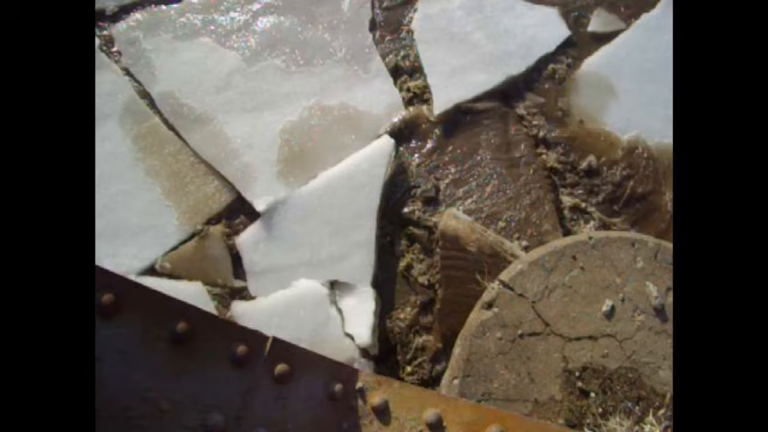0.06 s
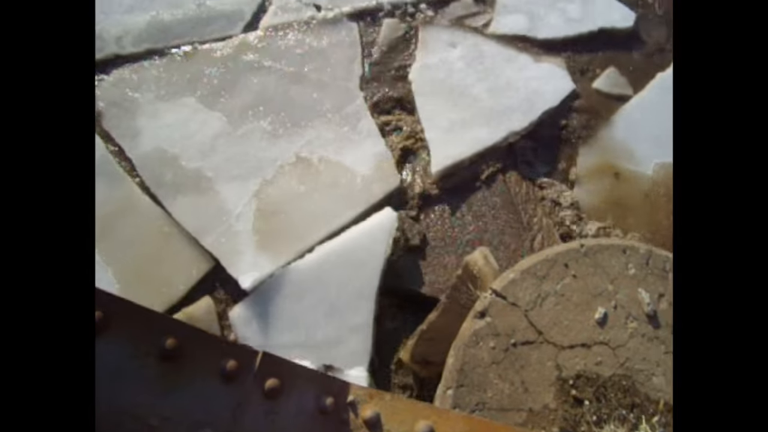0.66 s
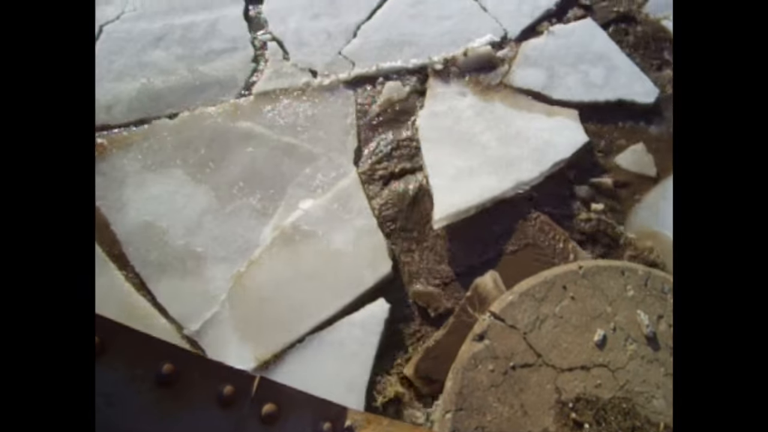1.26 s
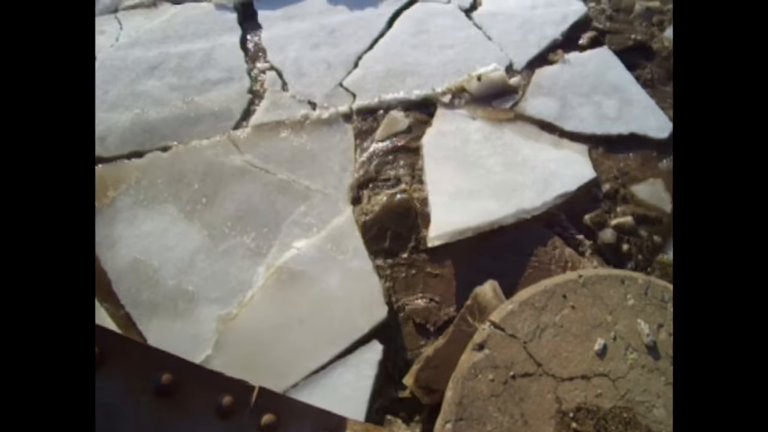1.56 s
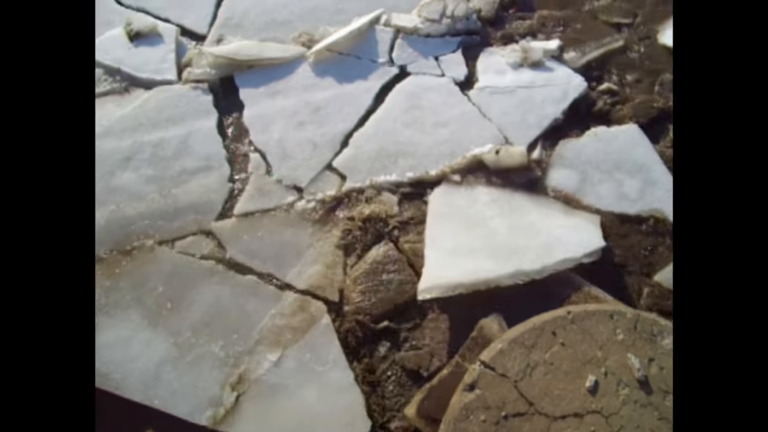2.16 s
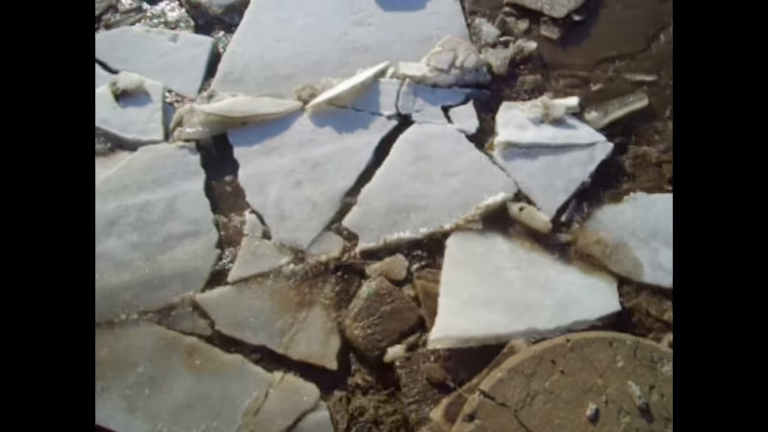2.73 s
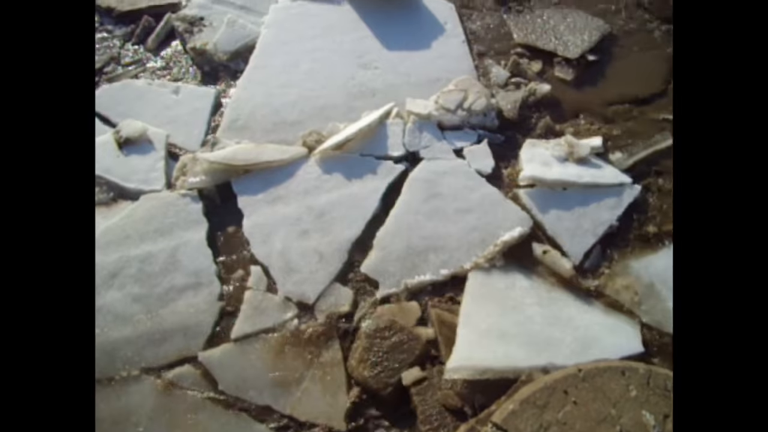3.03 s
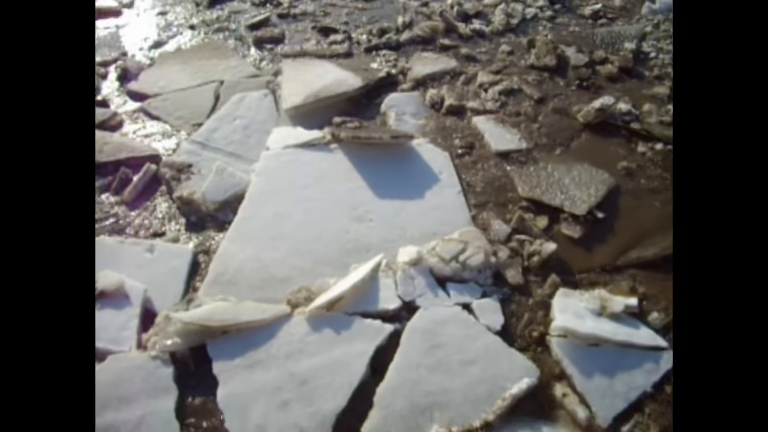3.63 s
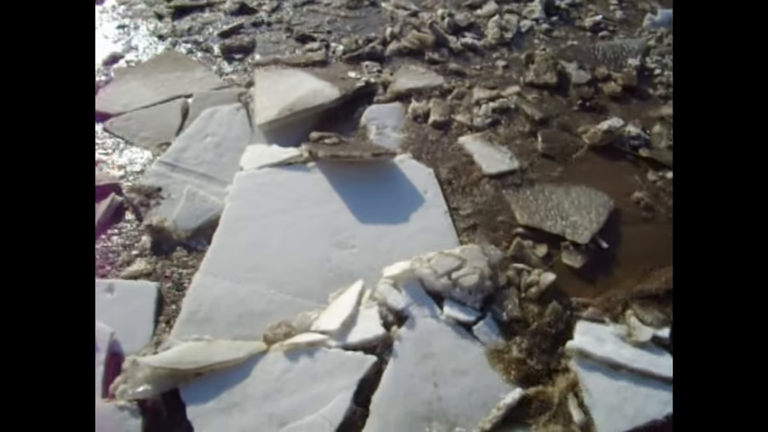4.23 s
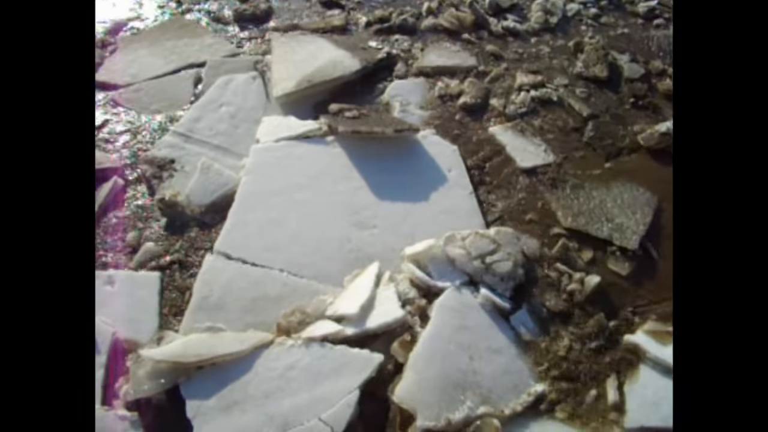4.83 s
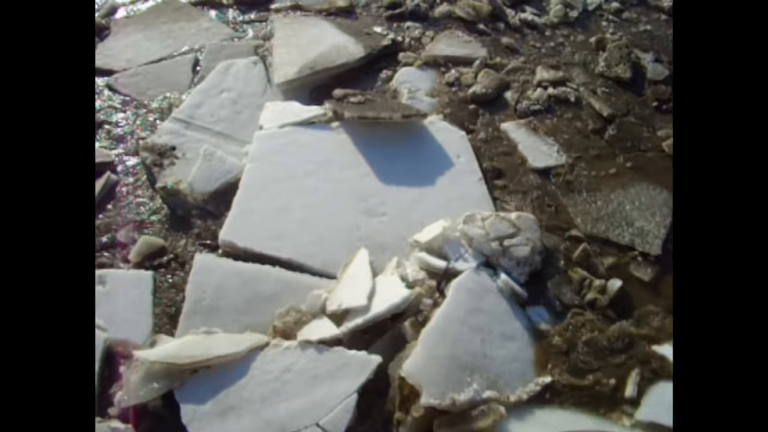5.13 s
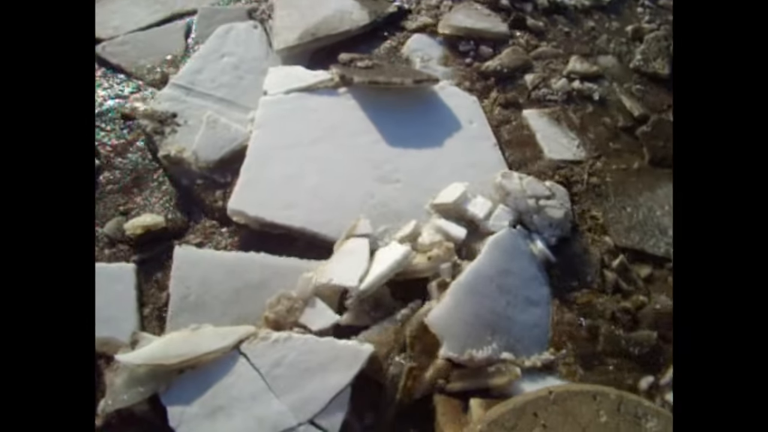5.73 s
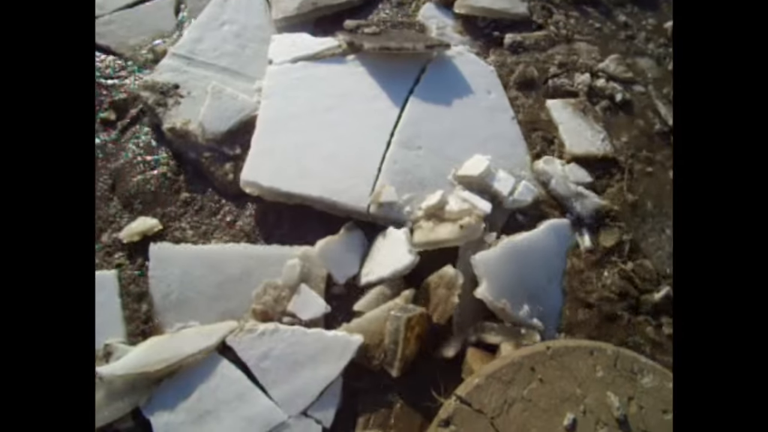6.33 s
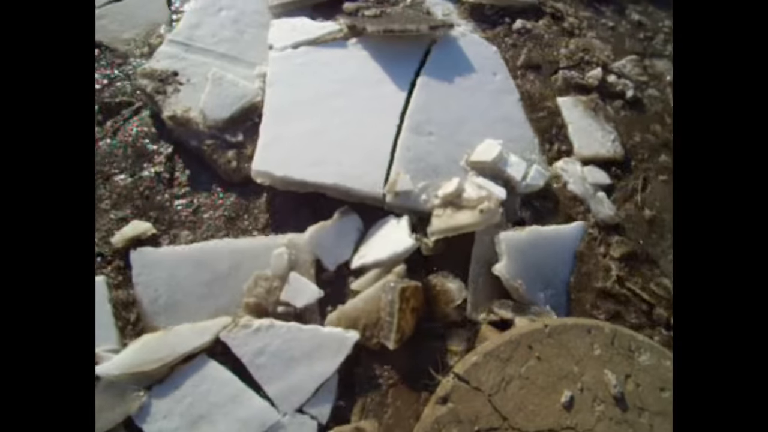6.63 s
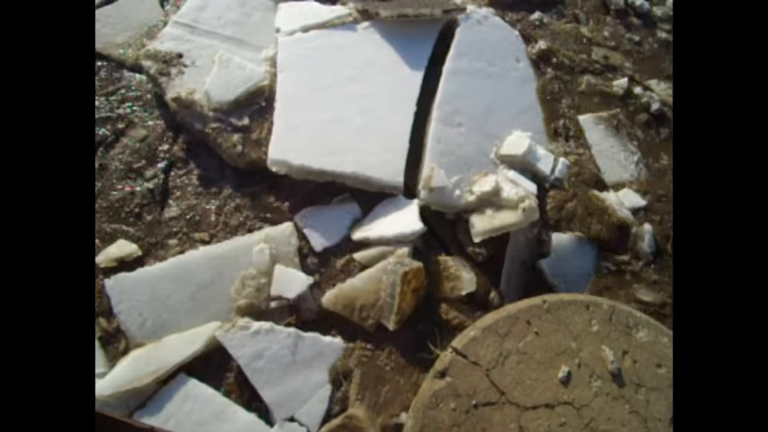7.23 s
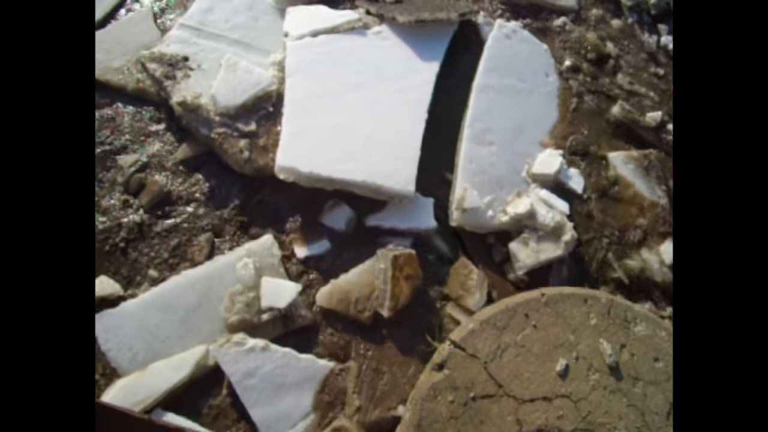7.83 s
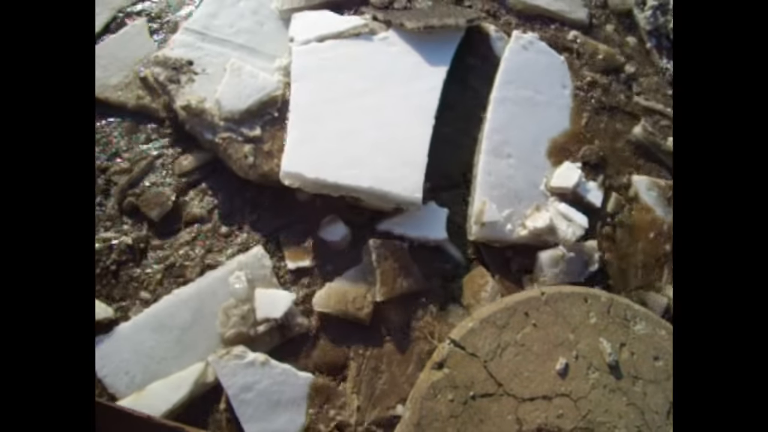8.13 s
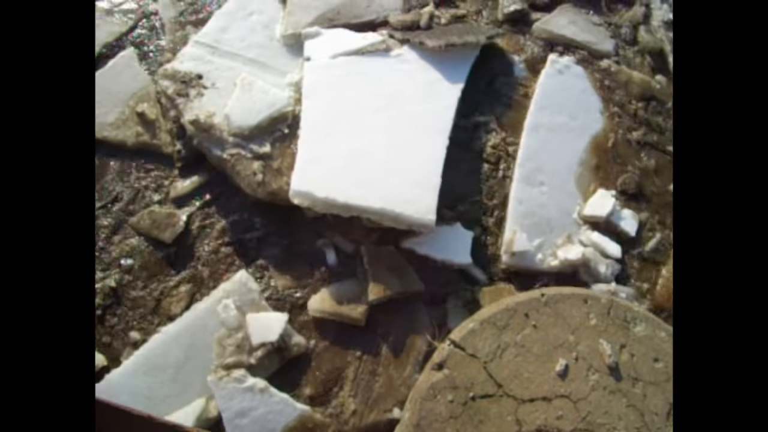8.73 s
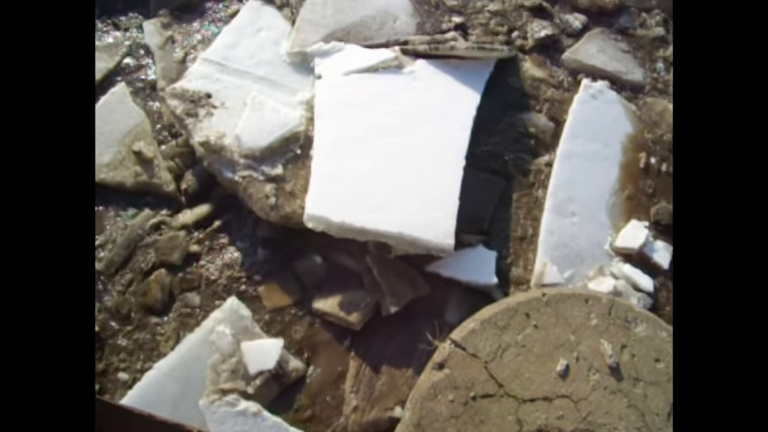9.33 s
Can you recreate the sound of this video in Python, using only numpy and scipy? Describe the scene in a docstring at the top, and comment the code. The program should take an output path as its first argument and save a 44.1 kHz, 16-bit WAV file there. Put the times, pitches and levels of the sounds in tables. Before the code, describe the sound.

A river full of broken ice rushes and bubbles, with slush fizzing on top. For the first three seconds or so, heavy floes grind and groan along a bridge pier with many low thuds. Then the grinding eases and single slabs bump, knock and crack now and then, with a sharper crack near the end. A faint deep hum and wind rumble lie underneath, all heard outdoors through a dull microphone.

```python
"""Broken ice on a river in spate

Heard from a bridge through a dull little microphone: water rushes and bubbles, and slush fizzes as
its crumbs rub. For three seconds heavy floes grind and groan along the pier, sticking and slipping;
then single slabs bump, knock and crack in the open stream. A faint hum lies underneath, and a low
drone rises and fades."""
import sys
import numpy as np
from scipy import signal
from scipy.fft import rfft, irfft, next_fast_len
from scipy.io import wavfile
from scipy.ndimage import map_coordinates

SR = 44100
rng = np.random.default_rng(int(sys.argv[2]) if len(sys.argv) > 2 else 0)


def unload_audio(sound):
    """Save the sound as a 16-bit wav file, at the path given as the first command line argument."""
    columns = np.transpose(np.atleast_2d(sound))
    # keep every value between -1 and 1, then stretch to whole-number steps
    steps = np.round(np.clip(columns, -1, 1) * 32767)
    wavfile.write(sys.argv[1], SR, steps.astype(np.int16))


N = 422037
TIME = np.arange(N) / SR
TURN_S = 3.41  # the scene changes: from the churn by the pier to the open stream

# floes shove against each other: (peak time [s], length [s], level [dB])
SHOVES = [(0.715, 0.14, -29.5), (0.948, 0.3, -22.5), (1.386, 0.21, -30), (1.692, 0.6, -23),
          (2.423, 0.11, -25), (2.714, 0.52, -27), (2.86, 0.18, -26.5), (3, .12, -26.5), (3.144, 0.15, -27),
          (3.405, 0.14, -27), (4.547, 0.15, -28), (5.334, .12, -26), (8.427, 0.27, -29.5)]


def amp(db):
    """Decibels to gain."""
    return 10 ** (np.asarray(db) / 20)


def unit(x):
    """Scales to rms 1."""
    return x / np.sqrt(np.mean(x ** 2) + 1e-20)


def curve(rows, column=1):
    """One column of a time table, at every sample."""
    rows = np.asarray(rows)
    return np.interp(TIME, rows[:, 0], rows[:, column])


def wander(per_s):
    """A smooth random curve of rms 1."""
    return unit(map_coordinates(rng.standard_normal(4096), [TIME * per_s], order=2, mode="wrap"))


def swell(peak_s, length_s, curvature=0.86):
    """Builds from 0 to 1 at peak_s and dies away just as fast."""
    ramp = np.interp(TIME, [peak_s - length_s / 2, peak_s, peak_s + length_s / 2], [0, 1, 0])
    return np.sin(np.pi / 2 * ramp) ** curvature


def level(bed, swells):
    """Gain of a bed with swells on top; their powers add."""
    swell_power = sum((amp(db) * swell(s, length)) ** 2 for s, length, db in swells)
    return np.sqrt(amp(curve(bed)) ** 2 + swell_power)


def add(mix, s, sound):
    """Mixes a sound in at time s."""
    part = mix[max(round(s * SR), 0):][:len(sound)]
    part += sound[:len(part)]


def colour(x, spectrum):
    """Shapes x to a spectrum that rolls off beyond its ends; the result has rms 1."""
    size = next_fast_len(N)
    hz = np.fft.rfftfreq(size, 1 / SR) + 1
    points_hz, db = np.transpose(spectrum)
    gain = amp(np.interp(np.log(hz), np.log(points_hz), db))
    roll_off = np.minimum(1, points_hz[-1] / hz) ** 2 * np.minimum(1, hz / points_hz[0])
    return unit(irfft(rfft(x, size) * gain * roll_off, size)[:N])


def pier_to_stream(x, by_pier, in_stream):
    """A quick crossfade from the colour by the pier to that of the open stream."""
    share = np.clip((TIME - TURN_S) * 20 + .5, 0, 1)
    return (1 - share) * colour(x, by_pier) + share * colour(x, in_stream)


def noise_band(edges_hz, samples):
    """Band-passed noise of rms 1."""
    band = signal.butter(2, edges_hz, "band", fs=SR, output="sos")
    return unit(signal.sosfilt(band, rng.standard_normal(samples)))


def patchy_noise(patch_db, width_hz, length_s):
    """Noise whose level drifts in patches of time and frequency."""
    hz, t, spectra = signal.stft(rng.standard_normal(N), SR, nperseg=512)
    place = np.meshgrid(hz / width_hz, t / length_s, indexing="ij")
    patches = unit(map_coordinates(rng.standard_normal((128, 1024)), place, order=1, mode="wrap"))
    return unit(signal.istft(spectra * amp(patch_db * patches), SR, nperseg=512)[1][:N])


def grains(per_s, low_hz, high_hz, cycles, glide, spread_db, pitches=28):
    """A random shower of short ringing blips of many pitches and sizes."""
    out = np.zeros(N)
    for hz in np.geomspace(low_hz, high_hz, pitches):
        age = np.arange(int(2 * cycles * SR / hz)) * hz / SR / cycles
        tone = np.sin(2 * np.pi * cycles * (age + glide * age ** 2 / 2))
        blip = tone * np.exp(-np.pi * age) * (1 - np.exp(-20 * age))
        where, size = rng.random((2000, 2))[:int(per_s * N / SR / pitches)].T
        gains = amp(spread_db * np.minimum(-np.log(1 - size), np.pi))  # many small, few large
        train = np.bincount((where * N).astype(int), gains, N)
        out += signal.oaconvolve(train, blip * hz)[:N]
    return unit(out)


def wind():
    """The faint low rumble of moving air."""
    # rumble colour: (frequency [Hz], relative level [dB])
    spectrum = [(5, -5), (20, -3.5), (50, -0.5), (80, -3.5), (160, -24.5)]
    return colour(rng.standard_normal(N), spectrum) * amp(-44.5 + 1.5 * wander(2.7))


def hum(pitch_hz=34.1):
    """A deep hum that wavers in pitch and level."""
    # slow rise and fall of the hum: (time [s], level [dB])
    bed = [(0, -41), (.35, -37.5), (1.2, -50), (2.2, -49), (2.85, -39), (3.6, -42), (5.6, -46.5),
           (7.7, -40), (8.8, -48.5), (9.57, -44.5)]
    gain = np.sqrt(2) * amp(curve(bed) + 1.4 * wander(7.4))
    hz = pitch_hz + 1.6 * wander(9)
    return gain * np.sin(2 * np.pi * np.cumsum(hz) / SR)


def drone():
    """A rough low tone that climbs in pitch and fades."""
    # the climb: (time [s], pitch [Hz], level [dB])
    climb = [(0, 51.6, -49), (.55, 59.3, -35), (.9, 60.4, -46), (1.6, 61.5, -44.5), (2.1, 71.4, -32.5),
             (2.4, 75.1, -34), (3.0, 77.6, -45), (3.4, 77.4, -72)]
    hz = curve(climb) + 1.8 * wander(15)
    gain = np.sqrt(2) * amp(curve(climb, column=2) + 2.4 * wander(14))
    return gain * np.sin(2 * np.pi * np.cumsum(hz) / SR)


def water(splash_db=-8.5):
    """Turbulent rush with bubbles that chirp upward as they surface; waves and shoves swell it."""
    # the rush, strongest in the churn by the pier: (time [s], level [dB])
    flow = [(0, -28.5), (1.2, -30), (2.05, -26), (2.6, -26.5), (3.5, -29.5), (4.4, -31.5), (5.15, -31.5),
            (6.35, -29), (7.8, -31), (8.6, -30), (9.57, -30)]
    # waves slosh between the floes: (peak time [s], length [s], level [dB])
    sloshes = [(.69, 0.16, -28), (.91, 0.18, -31), (1.38, 0.15, -29), (2.09, 0.066, -27),
               (2.275, .12, -22.5), (3.09, 0.12, -28.5), (3.77, 0.065, -31), (6.22, 0.098, -31),
               (6.5, 0.057, -36), (7.2, 0.081, -28), (7.65, 0.089, -27.5), (7.95, 0.093, -29),
               (8.11, 0.11, -30.5), (8.44, 0.094, -33), (9.0, 0.21, -31), (9.2, 0.16, -36)]
    # water colour in each place: (frequency [Hz], relative level [dB])
    by_pier = [(60, -24.5), (250, 3), (410, -2.5), (530, 1), (600, -2), (650, -0.5), (740, -1.5), (830, .5),
               (910, -3), (1080, -2), (1200, -10), (1500, -15), (1780, -23.5), (2600, -47)]
    in_stream = [(60, -15), (250, -6.5), (350, -3), (510, 0), (650, 0), (750, -2), (835, 0.5), (900, -2),
                 (1000, -4), (1250, -9), (1550, -16.5), (1800, -22.5), (2600, -33)]
    rush = patchy_noise(patch_db=0.3, width_hz=260, length_s=.05)
    bubbles = grains(per_s=700, low_hz=381, high_hz=1693, cycles=11.6, glide=0.097, spread_db=3.5)
    sound = pier_to_stream(rush + amp(-14) * bubbles, by_pier, in_stream)
    splashes = [(s, length, db + splash_db) for s, length, db in SHOVES]
    return sound * level(flow, list(sloshes) + splashes) * amp(0.32 + 0.64 * wander(22))


def slush():
    """Ice crumbs hiss and tick against each other, louder where they are crushed."""
    # the steady fizz: (time [s], level [dB])
    fizz = [(0, -42.5), (1.2, -41.5), (1.75, -44), (2.05, -38.5), (2.75, -38), (3.6, -39), (4.25, -42),
            (4.6, -40), (5.1, -41.5), (6.3, -39), (7.75, -41), (8.7, -41), (9.57, -39)]
    # slush is crushed between floes: (peak time [s], length [s], level [dB])
    crunches = [(0.043, 0.24, -43), (.36, 0.093, -39.5), (0.71, 0.2, -40), (1.16, 0.067, -43),
                (2.279, .13, -36), (2.729, 0.41, -40), (3.78, 0.065, -47), (9.201, 0.18, -48)]
    # slush colour in each place: (frequency [Hz], relative level [dB])
    by_pier = [(1200, -29.5), (1780, -10.5), (2100, -2.5), (2190, -4), (2300, 0.5), (2490, -2.5), (2640, 0),
               (2780, -5.5), (3020, -.5), (3330, -9), (3600, -5.5), (4120, -10.5), (4380, -6), (5200, -17)]
    in_stream = [(1200, -15), (1800, -5.5), (2000, -4), (2360, -2), (2550, -1.5), (2680, -4), (2930, -2.5),
                 (3350, -8), (3600, -7), (3900, -8), (4100, -10.5), (4330, -7.5), (4600, -10.5),
                 (5200, -17)]
    hiss = patchy_noise(patch_db=0.36, width_hz=430, length_s=.04)
    crumbs = grains(per_s=900, low_hz=1620, high_hz=5020, cycles=4.3, glide=0, spread_db=4.0)
    sound = pier_to_stream(hiss + amp(-13.5) * crumbs, by_pier, in_stream)
    return sound * level(fizz, crunches) * amp(0.18 + 0.5 * wander(25))


def rasp(width_hz=310):
    """A sheet of wet crumbs rubs along a floe and hisses in one broad, restless resonance."""
    # the rubbing: (time [s], pitch [Hz], level [dB])
    rub = [(0, 2284, -51), (1.7, 2296, -53.5), (2.5, 2300, -62), (3.8, 2380, -47), (4.6, 2470, -46),
           (5.4, 2444, -51), (6.1, 2344, -51), (6.9, 2340, -48.5), (7.6, 2340, -65)]
    centre_hz = curve(rub) + 45 * wander(18)
    carrier = np.exp(2j * np.pi * np.cumsum(centre_hz) / SR)
    pole = np.exp(-np.pi * width_hz / SR)
    low_noise = signal.lfilter([1], [1, -2 * pole, pole * pole], rng.standard_normal(N) / carrier)
    return unit((carrier * low_noise).real) * amp(curve(rub, column=2) + 1.6 * wander(12))


def grinding():
    """Floes stick and slip along each other, hardest in a shove; each slip booms in the slabs."""
    # the steady grind: (time [s], level [dB])
    grind = [(0, -27), (.5, -28.5), (1.5, -25), (2.2, -25), (3.2, -26.5), (3.8, -34), (4.6, -30),
             (4.95, -31), (5.4, -31), (6, -31.5), (7.2, -31.5), (7.85, -34.5), (8.9, -31), (9.57, -30.5)]
    # boom of the floes in each place: (frequency [Hz], relative level [dB])
    by_pier = [(40, -31), (65, -9.5), (85, -2), (110, 2.5), (140, 0), (195, -1.5), (250, 0.5), (295, -1.5),
               (330, -8), (400, -13.5), (700, -29.5)]
    in_stream = [(40, -26), (70, -7.5), (105, -1), (150, -1.5), (190, 0.5), (255, 1), (310, -6.5),
                 (400, -17), (700, -33.5)]
    slips = grains(per_s=130, low_hz=92.3, high_hz=390, cycles=4.1, glide=-0.12, spread_db=2.0)
    sound = pier_to_stream(rng.standard_normal(N) + amp(-20.5) * slips, by_pier, in_stream)
    return sound * level(grind, SHOVES) * amp(-0.36)


def groans(unsteady_db=0.5, waver=0.015):
    """A steady rub keeps one mode of a slab ringing; it swells and dies away."""
    # each rubbed slab has its own note: (peak time [s], length [s], pitch [Hz], level [dB])
    notes = [(.92, 0.33, 112.5, -24), (1.396, 0.22, 120.1, -23.5), (1.737, 0.37, 112, -23),
             (2.72, 0.18, 239, -26), (9.212, 0.25, 220.7, -25.5), (9.482, 0.21, 226.7, -29)]
    out = np.zeros(N)
    for peak, length, pitch_hz, db in notes:
        rub = swell(peak, length) ** 2 * amp(db + unsteady_db * wander(65))
        hz = pitch_hz * (1 + waver * wander(40))
        out += rub * np.sqrt(2) * np.sin(2 * np.pi * np.cumsum(hz) / SR)
    return out


def cracks(dull_hz=3800, snap_db=5, snap_s=0.0004):
    """An edge gives way in one sharp snap and crumbles after it; the wet slush dulls its treble."""
    # edges break: (time [s], level [dB], pitch [Hz], 60 dB decay [s], sharpness [Q])
    breaks = [(0.2855, -31, 2300, .03, 2.3), (0.361, -30, 2300, 0.045, 3), (0.6295, -28, 2110, 0.04, 4),
              (.6945, -30, 2800, 0.015, 1.5), (0.7192, -22.5, 2300, 0.022, 2.5),
              (0.7642, -28, 3050, 0.04, 6), (1.931, -27.5, 2240, .04, 2.1), (2.6564, -31, 2970, .04, 3),
              (3.7633, -30, 2100, .06, 2.5), (3.816, -31, 1600, .025, 3), (3.935, -26, 1650, 0.06, 2),
              (5.865, -33, 2410, .03, 3), (6.22, -31, 2400, 0.048, 2.5), (6.8473, -30, 2360, .03, 4),
              (9.0862, -30, 1940, 0.024, 2.3), (9.194, -20.5, 1480, 0.027, 3.5),
              (9.195, -21.5, 1900, .025, 3), (9.1985, -23, 2680, 0.04, 6), (9.4496, -30, 2300, .04, 2.3)]
    out, t = np.zeros(N), np.arange(SR // 4) / SR
    for s, db, hz, t60, sharpness in breaks:
        snap = amp(snap_db) * np.sin(2 * np.pi * hz * t) * np.exp(-t / snap_s)
        crumble = unit(signal.lfilter(*signal.iirpeak(hz, sharpness, SR), rng.standard_normal(len(t))))
        envelope = amp(-60 * t / t60) * (1 - np.exp(-t / snap_s))
        add(out, s, amp(db) * (snap + crumble * envelope))
    return signal.sosfilt(signal.butter(6, dull_hz, fs=SR, output="sos"), out)


def knocks(ring_s=0.03, rise_s=0.00055, grit=0.23, sharpness=2.2):
    """Small blocks knock together: one short hollow note, roughened by the crumbling contact."""
    # blocks meet: (time [s], level [dB], pitch [Hz])
    hits = [(.899, -16, 900), (1.097, -19, 1020), (1.365, -15, 912), (1.402, -16.5, 826), (1.793, -17, 700),
            (1.85, -16.5, 1100), (1.935, -16, 680), (2.076, -13.5, 905), (3.757, -16, 720),
            (3.938, -19, 800), (4.138, -17, 850), (4.609, -17.5, 854), (4.951, -16, 757), (5.919, -19, 700),
            (5.986, -15.5, 786), (6.077, -18, 595), (6.22, -14.5, 817), (6.501, -16, 791),
            (6.58, -18.5, 650), (7.195, -25, 850), (7.927, -20, 810), (9.012, -21, 767),
            (9.194, -13.5, 840)]
    out, t = np.zeros(N), np.arange(SR // 4) / SR
    for s, db, hz in hits:
        crumble = noise_band([hz * (1 - .5 / sharpness), hz * (1 + .5 / sharpness)], len(t))
        envelope = amp(db - 60 * t / ring_s) * (1 - np.exp(-t / rise_s))
        add(out, s, (np.sin(2 * np.pi * hz * t) + grit * crumble) * envelope)
    return out


def bumps(rise_s=0.0035, fall_s=0.019, rattle=0.24):
    """A struck slab flexes: short waves arrive first, so the thud falls in pitch."""
    # slabs collide: (time [s], level [dB], start pitch [Hz], end pitch [Hz], 60 dB decay [s])
    thuds = [(.697, -11.5, 303, 260, .08), (.777, -11.5, 129, 110, .09), (.902, -5, 220, 120, 0.05),
             (.927, -4, 150, 112, 0.037), (.959, -3.5, 150, 125, 0.05), (.976, -8, 230, 190, .06),
             (1.007, -11, 150, 120, 0.065), (1.093, -11, 265, 221, 0.089), (1.363, -9, 262, 121, 0.061),
             (1.402, -9, 190, 150, .045), (1.476, -11.5, 260, 235, .08), (1.543, -10, 271, 240, .09),
             (1.588, -3.5, 320, 280, 0.062), (1.610, -8.5, 250, 215, .05), (1.637, -9, 141, 118, 0.1),
             (1.684, -10, 250, 226, 0.057), (1.700, -11, 230, 200, 0.056), (1.736, -1, 135, 106, .045),
             (1.765, -6, 140, 110, 0.045), (1.773, -0.5, 135, 110, .045), (1.793, -9, 300, 260, .05),
             (1.820, -6, 180, 139.4, .04), (1.848, -8, 336, 257, 0.067), (2.014, -9, 238, 190, 0.055),
             (2.318, -6.5, 179, 140, 0.056), (2.389, -13, 202, 175, 0.088), (2.571, -4, 272, 228, 0.038),
             (2.688, -5.5, 239.4, 200, 0.065), (2.727, -6.5, 210, 185, 0.09), (2.799, -13.5, 210, 180, .07),
             (2.831, -6, 230, 180, 0.045), (2.988, -10, 198, 170, 0.052), (3.025, -4.5, 210, 160, .042),
             (3.101, -12, 204, 188, .13), (3.123, -12, 215, 197, 0.1), (3.190, -12, 268, 240, .06),
             (3.295, -10, 220, 180, 0.038), (3.330, -13, 147, 121, 0.14), (4.238, -18, 262, 230, 0.1),
             (4.502, -7.5, 205, 135, 0.075), (4.532, -17, 240, 220, 0.077), (5.311, -13, 240, 215, 0.1),
             (5.668, -17, 140, 115, .06), (5.736, -14.5, 135, 110, 0.059), (6.040, -16, 200, 160, .05),
             (8.350, -15, 188, 131, 0.073), (8.450, -12.5, 230, 200, .05), (9.093, -16.5, 233, 215, 0.096),
             (9.199, -12.5, 240, 220, 0.077), (9.452, -12.5, 235, 204, 0.11)]
    out, t = np.zeros(N), np.arange(SR // 2) / SR
    for s, db, start_hz, end_hz, t60 in thuds:
        hz = end_hz + (start_hz - end_hz) * np.exp(-t / fall_s)
        flex = np.sin(2 * np.pi * np.cumsum(hz) / SR)
        scrape = noise_band([90, 380], len(t))
        envelope = amp(db - 60 * t / t60) * (1 - np.exp(-t / rise_s))
        add(out, s, (flex + rattle * scrape) * envelope)
    return out


def tick(s=3.41, db=-16, decay_s=0.00044):
    """One tiny sharp tick."""
    out = np.zeros(N)
    add(out, s, amp(db) * np.exp(-TIME[:SR // 100] / decay_s))
    return out


def scene():
    """River, ice and the low background, in mono."""
    river = water() + slush() + rasp()
    ice = grinding() + groans() + bumps() + knocks() + cracks()
    background = hum() + drone() + wind()
    return (river + ice + background)[None]


def record(dry, mic_edge_hz=5020, top_hz=15700, hiss_db=-94):
    """The microphone passes little above 5 kHz; a trace of hiss and one tick come after it."""
    # the recorder's hiss: (frequency [Hz], relative level [dB])
    hiss_spectrum = [(5000, 0.5), (8000, -1.5), (15000, -5)]
    mic_filter = signal.firwin(161, mic_edge_hz, window=("kaiser", 7), fs=SR)
    top_filter = signal.firwin(511, top_hz, window=("kaiser", 9), fs=SR)
    dull = signal.oaconvolve(dry, mic_filter[None], "same")
    hiss = amp(hiss_db) * colour(rng.standard_normal(N), hiss_spectrum)
    return signal.oaconvolve(dull + hiss + tick(), top_filter[None], "same")


dry = scene()
out = record(dry)
unload_audio(out)
```